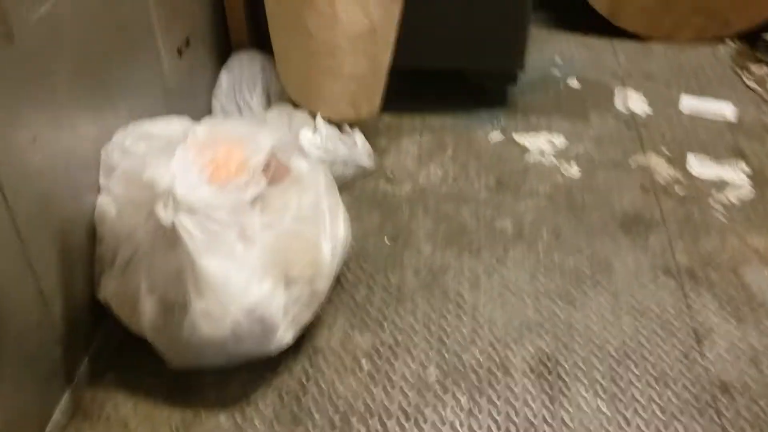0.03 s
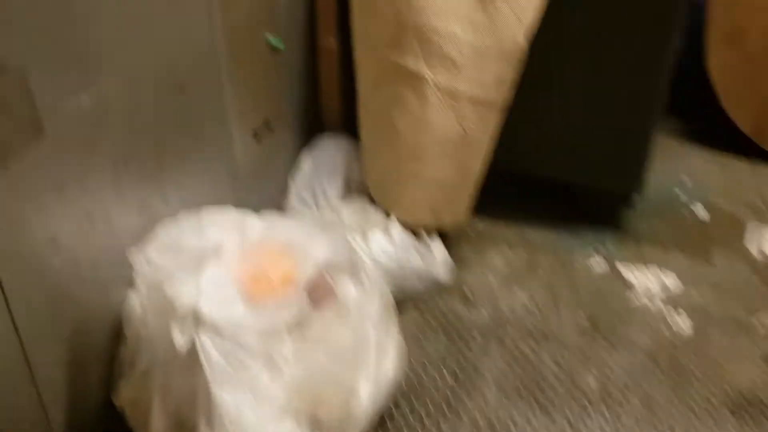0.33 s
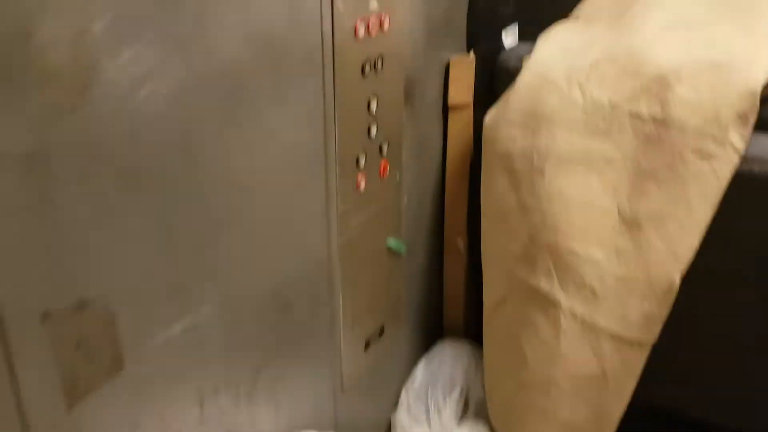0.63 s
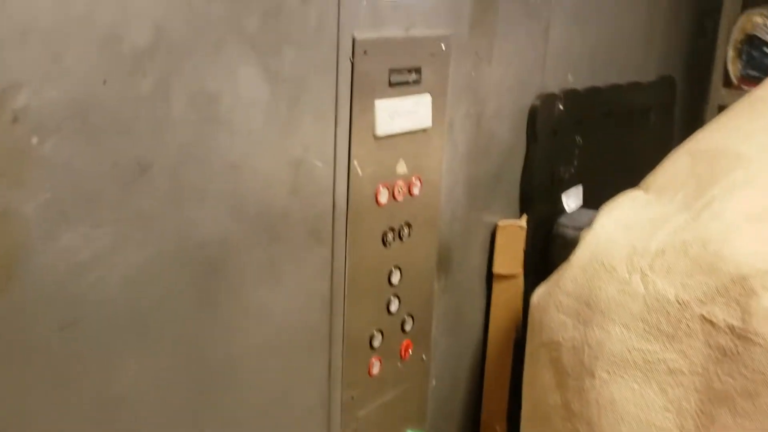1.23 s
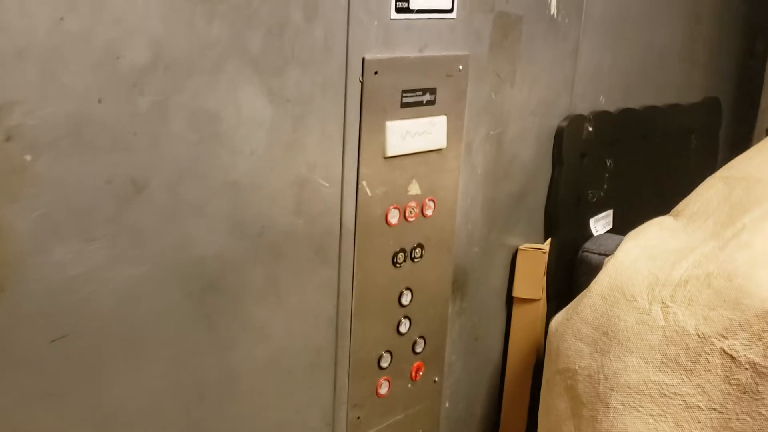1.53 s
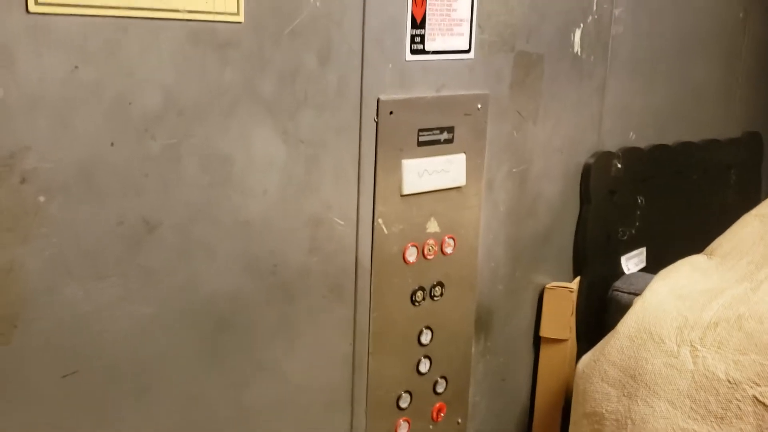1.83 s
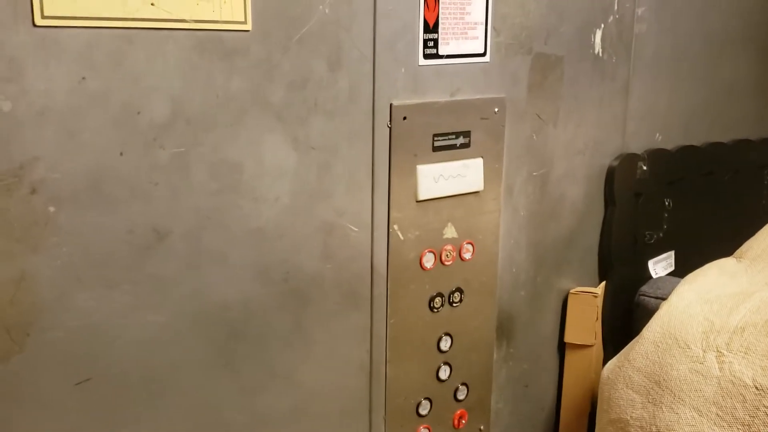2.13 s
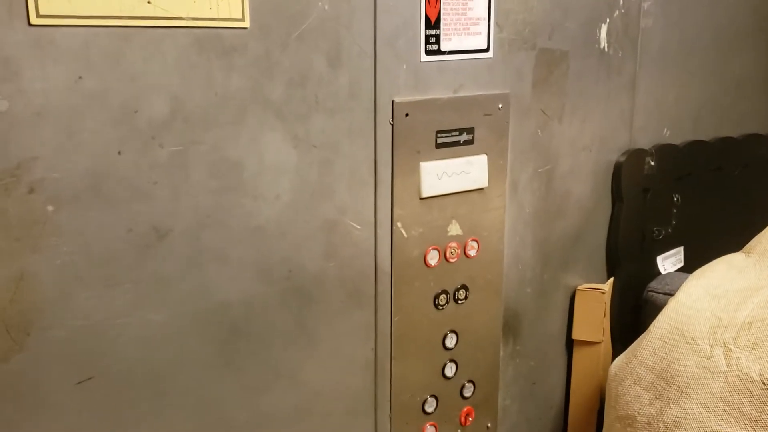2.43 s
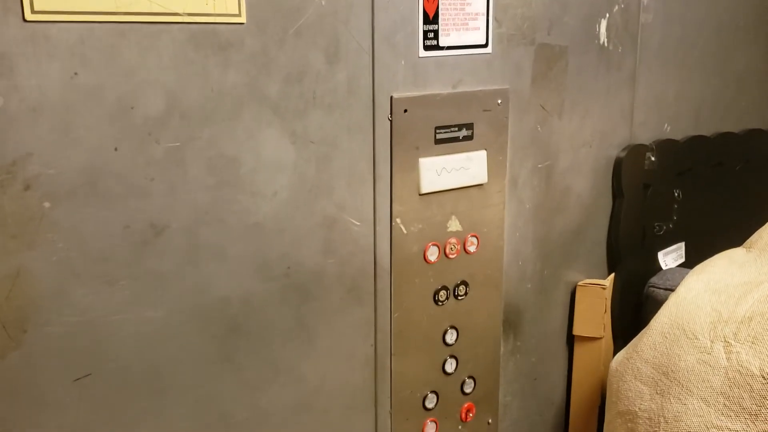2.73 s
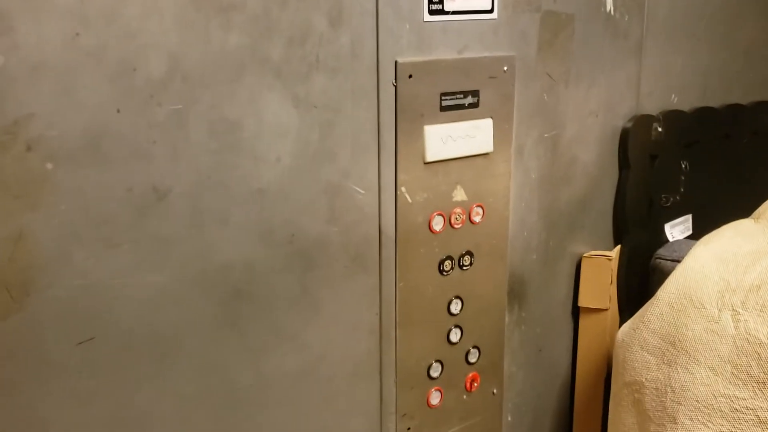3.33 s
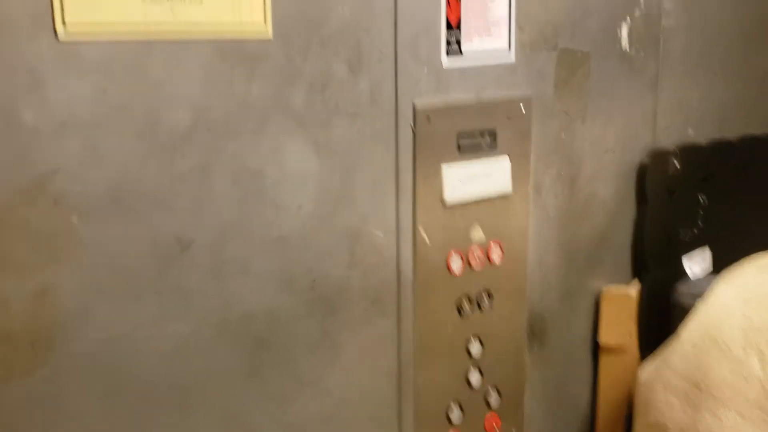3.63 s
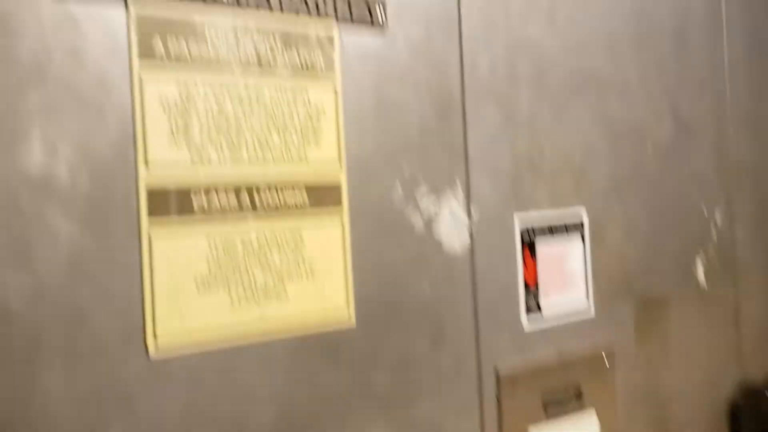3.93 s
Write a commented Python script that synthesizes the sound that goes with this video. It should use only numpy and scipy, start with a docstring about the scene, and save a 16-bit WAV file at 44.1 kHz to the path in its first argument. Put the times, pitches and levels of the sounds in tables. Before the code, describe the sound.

Close finger knocks on a microphone and a booming footstep over a low elevator drone.

```python
"""Fingers tap and rub a hand-held recorder, right at its left or right microphone port, ringing its case.
The place is a humming freight elevator. Farther off, a shoe scuffs, then a heavy step booms in the
steel floor and shakes the wall panels. The drive drones below, over the rumble of the shaft, and
something metal slides faintly, probably the guides on their rails."""
import sys
import numpy as np
from scipy import signal
from scipy.fft import rfft, irfft
from scipy.io import wavfile
from scipy.ndimage import uniform_filter1d, map_coordinates

SR = 44100
rng = np.random.default_rng(int(sys.argv[2]) if len(sys.argv) > 2 else 0)


def wrap_up_sound(samples):
    """Save the sound to the file named by the first command line argument, as 16-bit audio."""
    columns = np.atleast_2d(samples).T
    # keep every value between -1 and 1, then stretch to whole-number steps
    tamed = np.clip(columns, -1, 1)
    steps = np.round(tamed * 32767).astype(np.int16)
    wavfile.write(sys.argv[1], SR, steps)


N = 176400


# Fingers right at the microphones
# (time [s], left level [dB], right level [dB], knock pitch [Hz], snap relative to knock [dB])
FINGER_TAPS = [(.0003, -6, -49, 1780, -14.5), (0.0638, -24.5, -60, 1530, -1),
               (0.1351, -25.5, -54, 1230, 8.5), (0.1358, -16.5, -55, 397, -37),
               (0.179, -27, -35.5, 201, -20), (0.3804, -21, -59, 253, -43), (.51, -45, -46, 5300, 0),
               (3.5391, -25, -39.5, 500, -2.5), (3.5444, -18.5, -43, 173, -20),
               (3.5574, -54, -15.5, 910, -10.5), (3.5707, -32.5, -39.5, 380, 13.5),
               (3.6031, -24.5, -44.5, 320, -14), (3.630, -31.5, -59, 900, -7),
               (3.679, -46, -21.5, 1360, 1.5), (3.7012, -30, -7, 755, -10), (3.733, -52.5, -25, 635, -16),
               (3.7627, -45, -25.5, 660, -15)]
def finger_taps(size=4096, snap_decay_s=0.0011, snap_low_hz=2200):
    """Each tap is one heavily damped swing of the case, with a brief snap as the skin catches."""
    out, age = np.zeros((2, N)), np.arange(size) / SR
    for start, left_db, right_db, hz, snap_db in FINGER_TAPS:
        pulse = band(signal.unit_impulse(size), 11, hz * 1.95, order=4)
        knock = band(pulse, hz / 2.65, SR)
        catch = rng.standard_normal(size) * np.exp(-age / snap_decay_s)
        snap = band(catch, snap_low_hz, 12000, order=1)
        tap = knock / abs(knock).max() + undb(snap_db) * snap / abs(snap).max()
        add(out, start, undb([[left_db], [right_db]]) * tap)
    return out


# Skin on the case, at the microphones (time [s], length [s], left level [dB], right level [dB],
# pitch [Hz], hiss relative to rub [dB], release [s])
FINGER_RUBS = [(.001, 0.0024, -26.5, -74, 2190, -9, 0.0041), (0.138, 0.013, -47, -74, 2800, -3, 0.054),
               (0.209, 0.0071, -43.5, -45, 840, -23, 0.044), (0.259, 0.075, -55.5, -56.5, 2100, -2.5, 0.05),
               (0.288, 0.0031, -47, -58, 5400, -16, 0.0023), (3.547, 0.031, -38.5, -38.5, 87, -11.5, 0.042),
               (3.561, 0.026, -48, -48, 1300, -11, 0.039), (3.671, 0.024, -49, -50.5, 1040, 2, 0.063),
               (3.692, .04, -59, -34, 900, -2.5, 0.0029), (3.788, 0.0097, -83, -51, 1060, -3.5, 0.047),
               (3.959, 0.16, -64, -68, 2500, -32, 0.024)]
def finger_rubs():
    """Skin drags over the case near one port or the other."""
    out = np.zeros((2, N))
    for start, length, left_db, right_db, hz, hiss_db, release in FINGER_RUBS:
        add(out, start, undb([[left_db], [right_db]]) * friction(length, hz, hiss_db, release))
    return out


def friction(length, hz, hiss_db, release, size=16384, slips_per_s=6100, sag_octaves=.6):
    """Dense uneven slips sound through a broad resonance that falls as the rub slows, with hiss on top."""
    age = np.arange(size) / SR
    slips = (rng.random((2, size)) < slips_per_s / SR) * rng.standard_normal((2, size))
    slips *= undb(rng.standard_normal((2, size)))  # 1 dB of scatter
    resonance = band(slips, hz / 2.14, hz * 2.14)
    speed = 2 ** (sag_octaves * (.5 - np.minimum(age / length, 1)))
    body = np.array([map_coordinates(port, [np.cumsum(speed)], mode="mirror") for port in resonance])
    hiss = band(slips, 5000, SR, order=1)
    rise = np.minimum(age / (length * 0.1), 1)
    fall = np.exp(-np.maximum(age - length, 0) / release)
    return (unit(body) + undb(hiss_db) * unit(hiss)) * rise * fall


# Resonances of the case that holds the microphones (pitch [Hz], width [Hz], gain [dB])
CASE_RESONANCES = [(786, 190, -10.5), (1950, 530, -12)]
def case_ring(touch):
    """The hollow case adds its short ring to whatever touches it."""
    return touch + sum(undb(db) * band(touch, hz - width / 2, hz + width / 2, order=1)
                       for hz, width, db in CASE_RESONANCES)


def cabin_echo(sound, level_db=-20.5, t60_s=0.57):
    """The steel walls around the microphones return a short diffuse tail."""
    age = since(0)[:SR // 2]
    reflections = band(rng.standard_normal((2, len(age))), 210, 5140, order=1)
    tail = unit(reflections * fade(age, t60_s) * np.minimum(age / .008, 1)) / np.sqrt(len(age))
    return undb(level_db) * signal.fftconvolve(sound.mean(axis=0)[None], tail, axes=1)[:, :N]


def grip_rustle(level_db=-64, rest_s=0.57, release_s=0.33):
    """The hand hisses unevenly on the case as the recorder is swung up, dying away as it comes to rest."""
    hiss = unit(band(rng.standard_normal((2, N)), 4070, SR, order=1))
    return hiss * undb(level_db + 2.5 * drift(31.2)) * np.exp(-since(rest_s) / release_s)


# Tone of a shoe's knock and of the grit under it (frequency [Hz], relative level [dB])
KNOCK_SPECTRUM = [(40, -7), (90, 9), (180, 4), (370, -6.5), (750, -20.5), (4000, -43)]
GRIT_SPECTRUM = [(200, 11.5), (900, 5.5), (3600, -1), (6000, -5.5), (9000, -14), (16000, -59)]
# Shoes on the floor below the microphones (time [s], boom [dB], knock [dB], grit [dB], attack [s])
FOOTSTEPS = [(0.73, -47, -42, -47.5, 0.016), (0.769, -54, -42.5, -50.5, 0.0016),
             (1.2715, -30.5, -34, -41, 0.00046), (1.351, -51, -48.5, -69, 0.0034),
             (1.396, -43, -48, -59, 0.0028), (1.538, -46, -48, -57.5, 0.0083)]
def footsteps(knock_t60_s=0.7, grit_t60_s=0.37):
    """Steps knock on the steel floor, set it booming, shake the panels and crush grit."""
    out, knock, grit = np.zeros((2, N)), diffuse_noise(KNOCK_SPECTRUM), diffuse_noise(GRIT_SPECTRUM)
    knock_power = grit_power = 0
    for start, boom_db, knock_db, grit_db, attack in FOOTSTEPS:
        add(out, start, undb(boom_db) * floor_boom())
        add(out, start, undb(knock_db) * panel_ring())
        age = since(start)
        rise = np.minimum(age / attack, 1)
        knock_power += (undb(knock_db) * rise * fade(age, knock_t60_s)) ** 2
        grit_power += (undb(grit_db) * rise * fade(age, grit_t60_s)) ** 2
    crunch = undb(0.72 * drift(290))
    return out + knock * np.sqrt(knock_power) + grit * np.sqrt(grit_power) * crunch


# Modes of the floor and cabin, the same at both microphones (pitch [Hz], level [dB], t60 [s])
FLOOR_RESONANCES = [(59.36, 7.5, 0.75), (260.2, -8, 0.81), (302, -12.5, 1), (351.5, 0, 0.16)]
def floor_boom(rise_s=0.016):
    """The low modes of the steel floor build up under a step and ring out."""
    age = since(0)[:SR]
    ring = sum(undb(db) * np.sin(2 * np.pi * hz * age) * fade(age, t60)
               for hz, db, t60 in FLOOR_RESONANCES)
    return ring[None] * (1 - np.exp(-age / rise_s))


# Modes of the steel walls around the microphones (pitch [Hz], level [dB], t60 [s])
PANEL_RESONANCES = [(515, -11.5, 0.39), (709, -10, 0.19), (1280, -24.5, 0.22), (2460, -19.5, .3),
                    (3480, -15.5, 0.16)]
def panel_ring():
    """The wall panels ring after a knock, reaching each port in a different phase."""
    age = since(0)[:SR]
    return sum(undb(db) * np.sin(2 * np.pi * (hz * age + rng.random((2, 1)) / 2)) * fade(age, t60)
               for hz, db, t60 in PANEL_RESONANCES)


# A sole down at floor level
# (time [s], length [s], level [dB], pitch [Hz], hiss relative to drag [dB], release [s])
SHOE_SCUFFS = [(0.6895, 0.0049, -52, 1420, -8, 0.035), (0.725, 0.025, -64, 4990, 9, 0.033),
               (0.839, 0.041, -61, 2740, -13, 0.059)]
def shoe_scuffs():
    """A sole drags briefly over the steel floor."""
    out = np.zeros((2, N))
    for start, length, db, hz, hiss_db, release in SHOE_SCUFFS:
        add(out, start, undb(db) * friction(length, hz, hiss_db, release))
    return out


# Low drone and motor tone from below the cabin, centred between the microphones (time [s], level [dB])
DRONE_LEVEL = [(0, -46.5), (.3, -46.5), (.55, -55.5), (.75, -44), (1.6, -44), (2.22, -55), (2.35, -41),
               (2.42, -54), (2.52, -47), (3.1, -47.5), (3.3, -40), (3.48, -53)]
MOTOR_LEVEL = [(0, -49), (.45, -50.5), (1.5, -60), (2.8, -59), (3.6, -55)]
def drive_hum():
    """The drive sounds a low drone and a motor tone about two octaves above it."""
    drone = wavering_tone(hz=58.47, wobble_hz=1.2, flutter_db=1.5)
    motor = wavering_tone(hz=232.7, wobble_hz=.4, flutter_db=1.2)
    return drone * curve(DRONE_LEVEL) + motor * curve(MOTOR_LEVEL)


# Sliding metal, heard from inside the cabin (pitch [Hz], width [Hz], relative level [dB])
RAIL_RESONANCES = [(2202, 267, 1.5), (3500, 310, -7), (4570, 720, -10), (7020, 2300, -10.5)]
# Its swells on the left side (time [s], level [dB])
RAIL_SWELLS = [(0, -90), (.84, -63), (.92, -53), (1.0, -64), (1.35, -61.5), (1.5, -57.5), (1.75, -72),
               (2.43, -77), (2.54, -68), (2.9, -85)]
def guide_rails(right_db=-7.5, flutter_db=1.2, sing_hz=799, sing_db=-69.5):
    """Smooth sliding excites a few metal resonances; the rail sings softly for a moment."""
    rub = rng.standard_normal((2, N))
    ring = sum(undb(db + flutter_db * drift(14.74)) * unit(band(rub, hz - width / 2, hz + width / 2))
               for hz, width, db in RAIL_RESONANCES)
    swell = np.exp(-((since(0) - 2.86) / 0.17) ** 2)  # peaks at 2.86 s
    sing = undb(sing_db) * swell * unit(band(rub, sing_hz - 20, sing_hz + 20))
    return unit(ring) * curve(RAIL_SWELLS) * undb([[0], [right_db]]) + sing


# The shaft, heard from inside the cabin (frequency [Hz], relative level [dB])
SHAFT_SPECTRUM = [(20, -11.5), (38, -15.5), (60, 2.5), (110, -1.5), (190, -7.5), (280, -9.5), (400, -18),
                  (1000, -26), (1550, -32), (2150, -25.5), (3000, -39), (8500, -49), (11200, -36.5),
                  (16000, -39.5)]
# Its loudness on the left side (time [s], level [dB])
SHAFT_LEVEL = [(0, -43.5), (1.5, -49.5), (2.1, -49.5)]
# The right microphone's share (frequency [Hz], gain [dB])
SHAFT_RIGHT_SHARE = [(250, -0.5), (700, -5), (4000, -6), (7000, -10)]
def shaft_air():
    """Rumble and air of the shaft fill the cabin, duller on the right."""
    left, right = diffuse_noise(SHAFT_SPECTRUM) * curve(SHAFT_LEVEL)
    return np.array([left, colour(right, SHAFT_RIGHT_SHARE)])


def wavering_tone(hz, wobble_hz, flutter_db):
    """A machine tone that wavers in pitch and level."""
    phase = 2 * np.pi * np.cumsum(hz + wobble_hz * drift(12)) / SR
    return unit(np.sin(phase) * undb(flutter_db * drift(12)))


def diffuse_noise(spectrum, alike_below_hz=960):
    """Coloured cabin noise at two ports, alike in the bass and unrelated in the treble."""
    mid, side = rfft(rng.standard_normal((2, N)))
    hz = np.arange(N // 2 + 1) * SR / N
    likeness = 0.92 / (1 + (hz / alike_below_hz) ** 2)
    ports = mid * np.sqrt(1 + likeness) + side * np.sqrt(1 - likeness) * np.array([[1], [-1]])
    return unit(colour(irfft(ports, N), spectrum))


def undb(db):
    """Decibels to gain."""
    return 10 ** (np.asarray(db) / 20)


def unit(x):
    """Scale to rms 1."""
    return x / np.sqrt(np.mean(x ** 2))


def since(start):
    """Seconds since a start, zero before it."""
    return np.maximum(np.arange(N) / SR - start, 0)


def fade(age, t60):
    """Exponential decay, 60 dB down after t60 seconds."""
    return np.exp(-np.log(1000) * age / t60)


def curve(points):
    """Gain over time from (time [s], level [dB]) points."""
    return undb(np.interp(since(0), *np.array(points).T))


def colour(x, points):
    """Filter by (frequency [Hz], gain [dB]) points."""
    hz, db = np.array(points).T
    log_hz = np.log(np.arange(N // 2 + 1) * SR / N + 1e-9)
    return irfft(rfft(x) * undb(np.interp(log_hz, np.log(hz), db)), N)


def band(x, low_hz, high_hz, order=2):
    """Causal band-pass, its top edge held below half the sample rate."""
    high_hz = min(high_hz, SR * .45)
    sections = signal.butter(order, [min(low_hz, high_hz - 10), high_hz], "band", fs=SR, output="sos")
    return signal.sosfilt(sections, x + 1e-18)


def drift(rate_hz):
    """Smooth random drift, rms 1."""
    hold = int(SR / rate_hz)
    stairs = np.repeat(rng.standard_normal(N // hold + 1), hold)
    return unit(uniform_filter1d(uniform_filter1d(stairs, hold), hold)[:N])


def add(out, start, sound):
    """Mix a short sound in at a time."""
    i = max(int(start * SR), 0)
    out[:, i:i + sound.shape[1]] += sound[:, :max(N - i, 0)]


def scene():
    """Handling at the microphones, shoes on the floor and the running elevator all around."""
    taps = case_ring(finger_taps())
    handling = taps + cabin_echo(taps) + case_ring(finger_rubs()) + grip_rustle()
    return handling + footsteps() + shoe_scuffs() + drive_hum() + guide_rails() + shaft_air()


# Colour of the two microphone ports (frequency [Hz], gain [dB])
LEFT_RESPONSE = [(6500, -2), (11000, -11.5)]
RIGHT_RESPONSE = [(4500, -2), (7500, -8), (9500, -2)]
def record(dry):
    """Each port colours the treble; the recorder cuts the top above 16 kHz."""
    ports = np.array([colour(dry[0], LEFT_RESPONSE), colour(dry[1], RIGHT_RESPONSE)])
    return signal.sosfilt(signal.ellip(10, .2, 80, 16000, fs=SR, output="sos"), ports)


dry = scene()
out = record(dry)
wrap_up_sound(out)
```